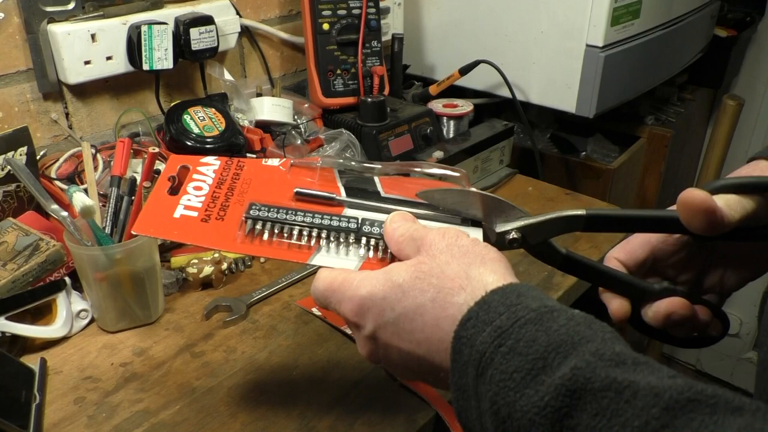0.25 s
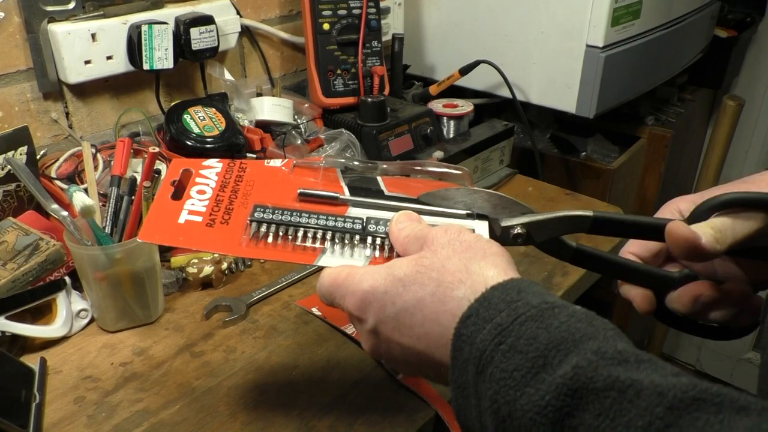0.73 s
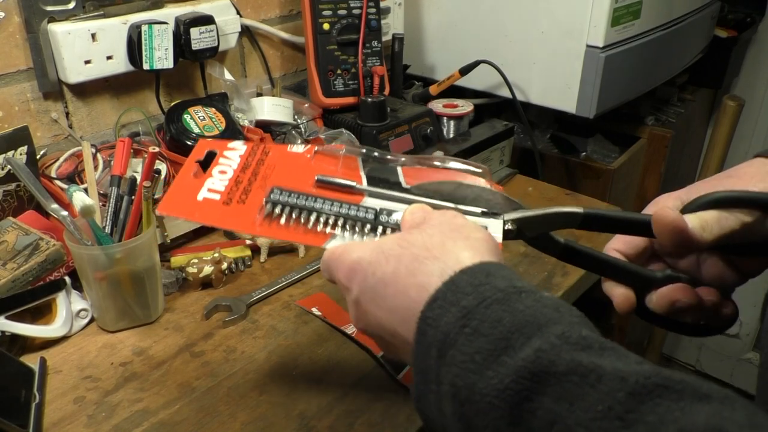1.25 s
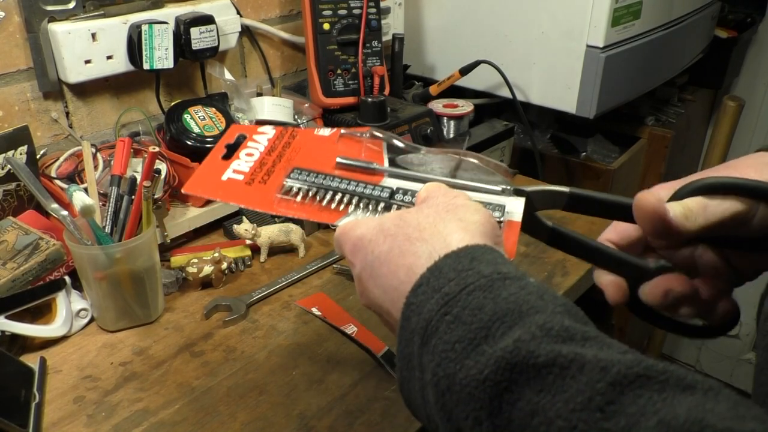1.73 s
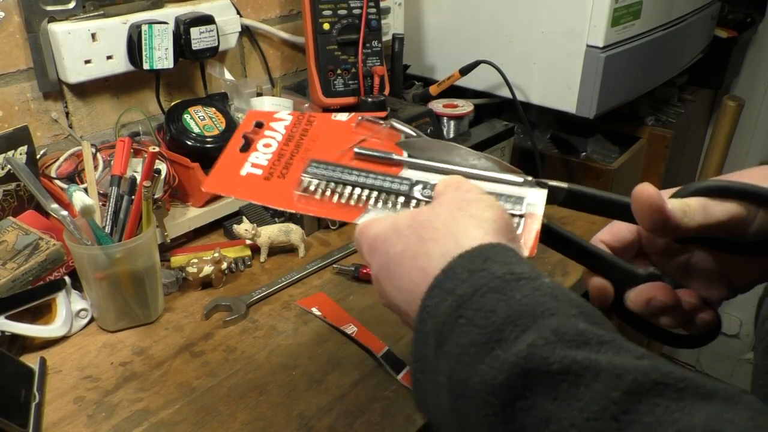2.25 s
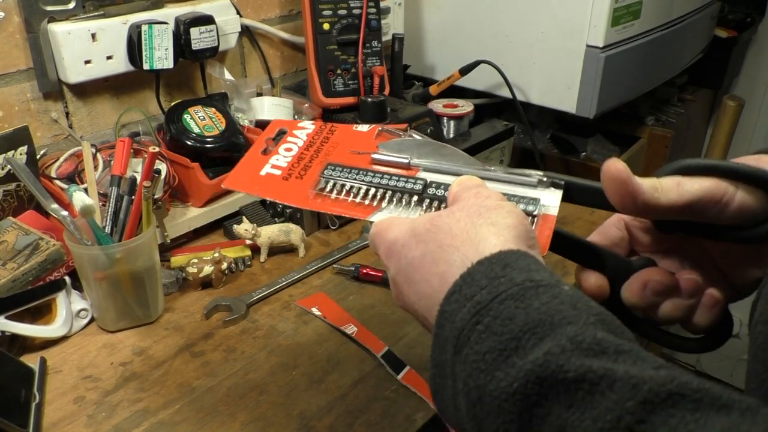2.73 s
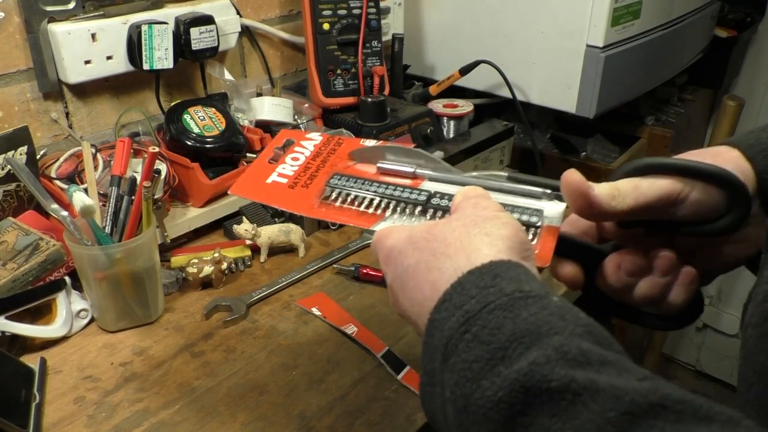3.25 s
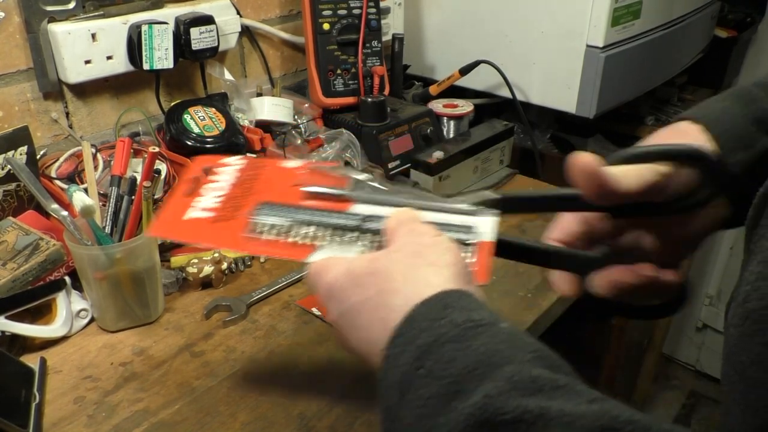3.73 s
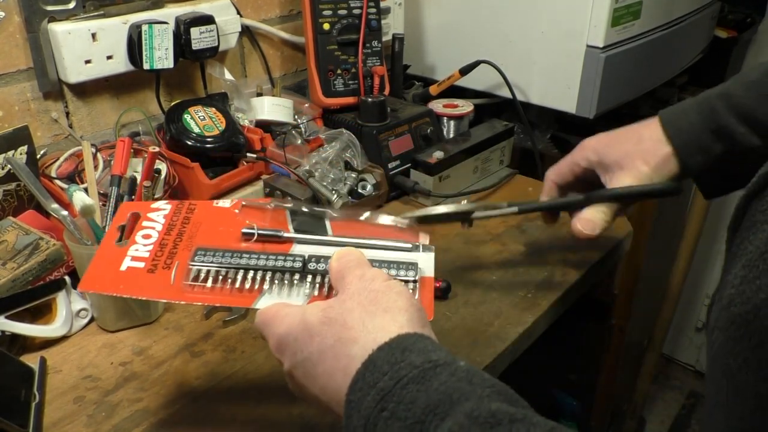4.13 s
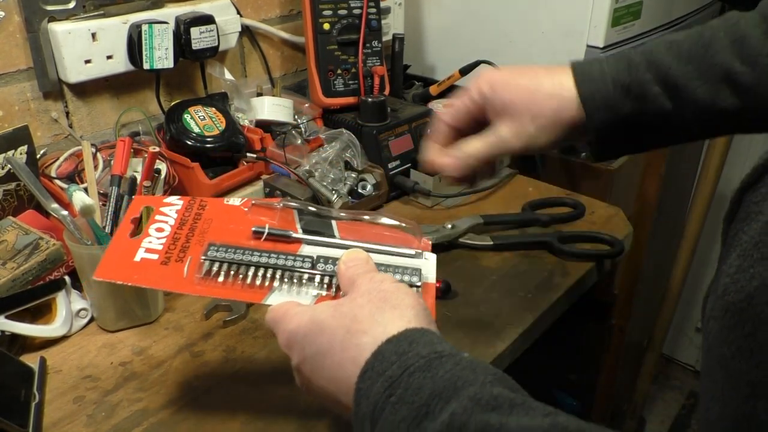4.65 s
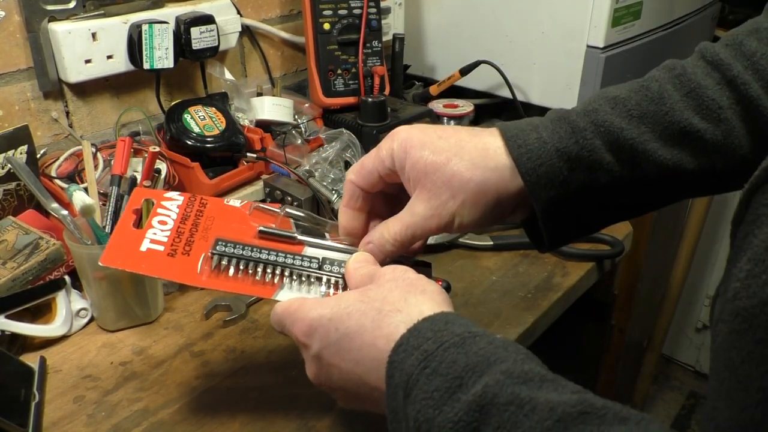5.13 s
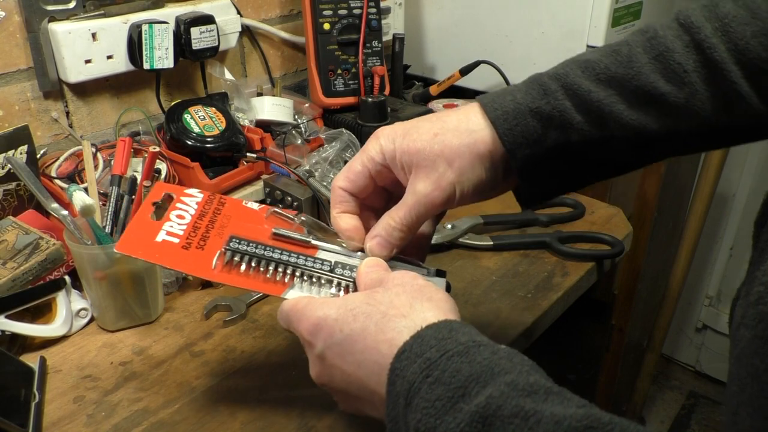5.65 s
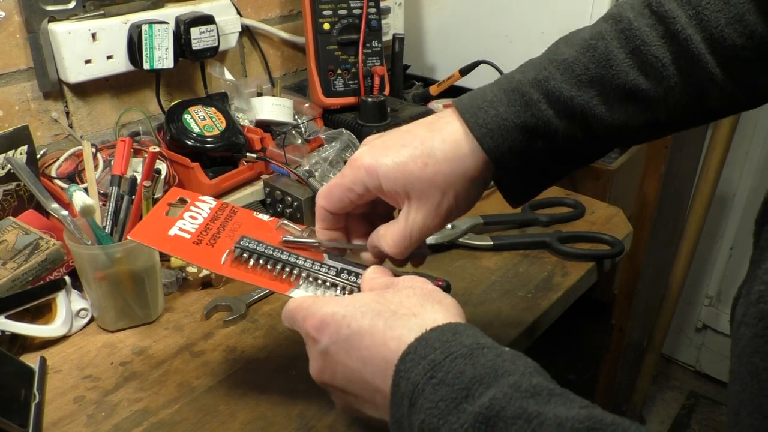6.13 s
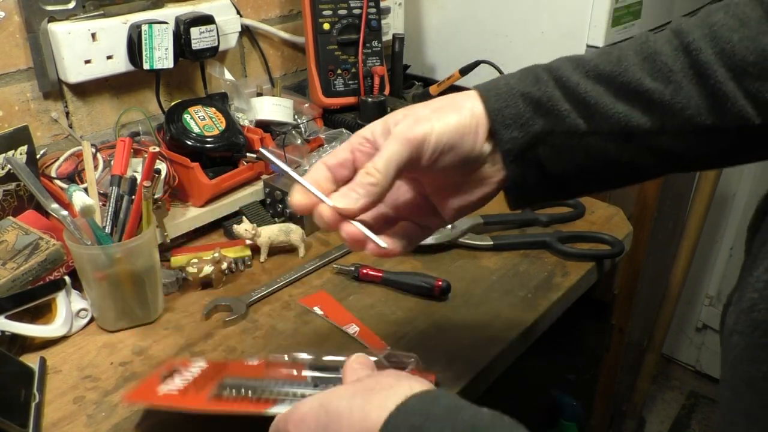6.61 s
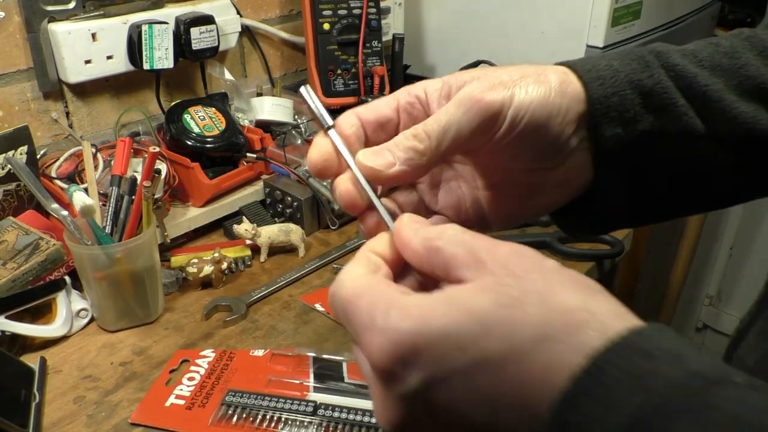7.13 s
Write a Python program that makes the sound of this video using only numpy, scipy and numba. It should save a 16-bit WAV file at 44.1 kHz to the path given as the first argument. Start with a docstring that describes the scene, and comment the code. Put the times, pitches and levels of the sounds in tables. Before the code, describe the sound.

Sharp irregular plastic cracks and short scrapes, a wood-and-steel clank, then crinkling, a brief creak and a light pack dropping onto a bench.

```python
"""Over faint room noise and rustling, a stiff plastic blister pack slaps softly against a hand.
Heavy tin snips then chew through it: sharp cracks are bursts of tiny random slips, scrapes a steadier stream.
The snips are laid down on a wooden bench, clanking, while decaying sine waves ring for wood and steel.
Fingers prise a part out of the crackling blister with a creak; last, the pack drops on the bench.
A small workshop's echo, made from fading noise, surrounds it all."""
import sys
import numpy as np
from scipy import signal
from scipy.fft import rfft, irfft
from scipy.io import wavfile
from numba import njit

SR = 44100
rng = np.random.default_rng(int(sys.argv[2]) if len(sys.argv) > 2 else 0)


def master_out(mix):
    """Clip the mix to full scale and print it as 16-bit PCM to the path in sys.argv[1]."""
    frames = np.transpose(np.atleast_2d(mix))
    ceiling = np.clip(frames, -1, 1)
    pcm = np.round(ceiling * 32767).astype(np.int16)
    wavfile.write(sys.argv[1], SR, pcm)


N = 325017  # length in samples

FLOOR_DB = -57.5  # level of the steady background
TOP_HZ = 16000  # highest frequency the recorder keeps
SHELL_DECAY_S = .0045  # time for the shell's ring to fall to about a third
LEAD_S = .02  # room for a sound to build up before its listed time

# Steady background noise. Each row: frequency in Hz, level in dB.
FLOOR_SPECTRUM = [(15, -58.5), (25, -8), (134, -6.5), (285, -10.5), (354, -13.5), (439, -13.5),
                  (591, -29.5), (714, -21.5), (818, -27.5), (1070, -22.5), (1330, -22), (1940, -28),
                  (5880, -48.5), (14800, -33.5), (16000, -50.5)]
# How much the background differs between left and right. Each row: frequency in Hz, level in dB.
FLOOR_WIDTH = [(40, -7.5), (150, -3.5), (400, -1.5), (1500, 2), (6000, -6.5), (12000, -3.5)]
# Sleeves and fingers shifting. Each row: time in seconds, level in dB.
RUSTLE_LEVEL = [(0, -55.5), (.42, -72), (.8, -63.5), (1.7, -61), (2.12, -62.5), (2.65, -50), (2.85, -61),
                (3.35, -62), (3.6, -43), (4.1, -48), (4.25, -67.5), (4.7, -62), (5.2, -52.5), (6.05, -57),
                (6.42, -67), (6.56, -54), (7, -55), (7.37, -70)]
# Basic tone of the plastic and card pack. Each row: frequency in Hz, level in dB.
PACK_SPECTRUM = [(40, -21.5), (150, -6.5), (250, -1), (330, 8.5), (450, 0.5), (650, -6), (850, -6.5),
                 (1100, -1), (1900, 1.5), (2800, -1.5), (4000, -1), (7000, -6), (12000, -6), (16000, -18.5)]
# The pack slapping the hand and the bench. Each row: time in seconds, level in dB, ring in Hz,
# card body in dB, decay in seconds.
SLAPS = [(0.2015, -39, 1290, 19, 0.014), (6.6209, -28, 1730, 29.5, 0.017), (6.648, -25, 1360, -10, .01),
         (6.74, -15, 1190, -6, 0.012), (6.7573, -13, 975, -4.5, 0.0084), (6.7724, -25.5, 1140, -1, 0.0068),
         (6.8619, -22, 1530, -0.5, 0.0065), (6.8787, -25.5, 1760, -3, 0.013),
         (6.9688, -36.5, 1630, 12, 0.011)]
# The sheet cracking under the blades. Each row: time in seconds, level in dB, ring of the free panel in Hz,
# card body in dB, treble in dB, decay in seconds, share of the single snap from 0 to 1.
CRACKS = [(0.6286, -25.5, 1930, 5.5, -3.5, 0.013, 0.02), (0.6525, -32.5, 990, 13, -6, 0.014, 0.65),
          (0.7188, -31, 2530, 2, -1, 0.0058, 0.02), (1.065, -23.5, 980, -11, -6, 0.0073, 0.03),
          (1.1051, -30, 2520, 1, 5, 0.0061, 0), (1.436, -31, 985, 0, -6, 0.017, 0.1),
          (1.4495, -26.5, 1020, 5, -13, 0.023, 0.35), (1.482, -33.5, 970, -6, -11, .008, 1),
          (1.4955, -18, 950, -5, -8, .011, 0.07), (1.6737, -17.5, 3640, -9.5, -7, 0.0041, 0.28),
          (1.806, -16.5, 1270, -5, -0.5, 0.017, 0.08), (1.8186, -26.5, 1380, 30, -4, 0.0043, 0.54),
          (1.9654, -22, 3900, -16, 14, 0.0084, 0.43), (2.231, -24.5, 6100, -7, -4, 0.0081, 0.5),
          (2.2357, -19.5, 1600, 13.5, 6.5, 0.012, 0.39), (2.2443, -19, 1410, 5, -5, .012, 0.04),
          (2.396, -22.5, 1140, 7, -15, 0.01, 0.09), (2.415, -21.5, 6700, -3, 0, 0.0082, 0.18),
          (2.451, -27, 3560, -7, 9.5, 0.011, 0.6), (2.5076, -30.5, 3500, -22.5, 6, 0.0092, 0.05),
          (2.7552, -29.5, 3300, -1, 12, 0.014, 0.6), (2.9206, -21, 6230, -7, 5, 0.009, 0.5),
          (2.9256, -28, 1410, 0, -6, 0.0055, 0.08), (2.946, -33, 2460, 9, 18, 0.01, 0.08),
          (3.0802, -29, 3540, -28, 6, 0.011, 0.15), (3.2419, -24.5, 2450, -3, 1.5, 0.016, 0.32),
          (3.252, -24.5, 2920, 14.5, 1, 0.0053, 0.04), (3.2605, -31, 1040, -3, -13, 0.011, 0.66),
          (3.5221, -19.5, 2530, 1.5, 0, 0.0032, 0.2), (3.532, -22, 1730, 2.5, -3, 0.01, 0),
          (3.754, -30, 6800, -1.5, -8, 0.0049, .02), (3.9459, -16, 1910, 1, -15, 0.0043, .45),
          (4.027, -21, 3380, 9.5, -8, 0.0064, 0.24), (4.0419, -19.5, 3680, 8, -0.5, 0.0038, 0.63)]
# Blades, fingers and bench dragging on the pack. Each row: start in seconds, end in seconds,
# level in dB before the common trim, ring in Hz, card body in dB, treble in dB.
SCRAPES = [(0.827, 0.967, -48, 3250, 5.5, 4), (1.011, 1.021, -45, 1170, 13, -4),
           (1.21, 1.262, -38, 1090, -7.5, 3.5), (1.513, 1.545, -30.5, 2240, 11, -13),
           (1.621, 1.679, -30.5, 3050, -4, 1.5), (1.764, 1.838, -34, 1370, 4, 1),
           (1.926, 1.952, -34.5, 3750, -3, 2), (2.375, 2.424, -27, 2880, 11.5, 6),
           (2.52, 2.58, -41.5, 1400, -7.5, -0.5), (2.953, 2.997, -38.5, 2280, 12.5, -6),
           (3.093, 3.141, -35, 2930, 5.5, 6.5), (3.421, 3.439, -29, 5600, -16, 2),
           (3.654, 3.694, -38.5, 5530, -3, -2), (3.714, 3.749, -34.5, 2940, 5.5, 0.5),
           (3.81, 3.879, -36, 2220, -19, -8), (3.958, 4.086, -33, 2180, 13, -1),
           (5.093, 5.117, -34, 6050, -19, 0), (5.42, 5.453, -33.5, 6900, -4, 2),
           (5.517, 5.61, -45, 3820, -17, 9.5), (5.939, 5.964, -36.5, 1170, -11, 1.5),
           (6.614, 6.721, -35, 1600, 12, -8.5), (6.77, 6.932, -39, 1790, 8, -13.5)]
# Lone ticks of the flexing pack. Each row: time in seconds, level in dB, ring in Hz.
TICKS = [(1.348, -54.5, 3430), (2.173, -46.5, 1480), (2.2869, -35, 1100), (2.6855, -40.5, 2730),
         (3.0511, -45, 5100), (3.3907, -38, 2770), (4.8452, -38, 2250), (4.8975, -40, 3360),
         (5.987, -36, 6300)]
# Two hard snaps, each with a low thump. Each row: time in seconds, level in dB, ring in Hz,
# thump in dB, thump rise time in seconds.
SNAPS = [(2.5793, -14.5, 4310, -14.5, 0.0003), (3.6836, -20, 5050, -20, 0.00036)]
# Dull bumps of the pack against hand, blades and bench. Each row: time in seconds, level in dB,
# pitch in Hz before a small random detune, time to fall by 60 dB in seconds.
BUMPS = [(3.458, -32.5, 435, 0.041), (3.588, -31, 355, 0.055), (3.6, -25, 326, 0.04),
         (3.625, -33, 342, 0.038), (6.628, -39, 162.8, 0.58), (6.741, -42, 129.5, 0.3),
         (6.859, -46.5, 154, 0.5)]
# Steel striking steel as the snips land. Each row: time in seconds, level in dB before the steel trim.
CLASHES = [(4.339, -49.5), (4.5245, -51.5)]
# The snips meeting the bench. Each row: time in seconds, level in dB, contact brightness in Hz, decay in seconds.
KNOCKS = [(4.3394, -26.5, 5460, 0.0054), (4.3421, -17, 1200, 0.0063), (4.3938, -22.5, 586, 0.013),
          (4.4175, -31, 397, 0.053), (4.5226, -16.5, 1370, 0.004), (4.5257, -19, 9900, 0.01),
          (4.576, -27, 640, 0.013), (4.5949, -24, 774, 0.025), (4.618, -34.5, 1470, 0.019)]
# Tone of the snips' contact with the bench. Each row: frequency in Hz, level in dB.
CLANK_SPECTRUM = [(40, -61), (70, -41.5), (125, -2), (280, 2.5), (520, 0), (750, -4), (1050, 3.5),
                  (1450, 3.5), (2100, 4.5), (3200, 2.5), (6500, 1), (10500, 7), (16000, 3)]
# Ringing of the bench top. Each row: pitch in Hz before detune, relative level in dB,
# time to fall by 60 dB in seconds.
BENCH_MODES = [(102, -22, 0.26), (132.6, 6, 0.32), (158, -5.5, 0.66), (264, -15, .2), (316, 6.5, 0.11),
               (420, -3, 0.21), (527, 10, 0.081), (584, -25, 0.091), (630, 1, .15)]
# Ringing of the steel blades and handles. Each row: pitch in Hz before detune, relative level in dB,
# time to fall by 60 dB in seconds.
STEEL_MODES = [(2490, 3, .25), (4748, -4, .55), (5448, -2, .33), (6130, -8, .25), (7251, -6, .4),
               (7730, -5, .27), (9895, -1, .36), (10780, -4, .25), (11095, -3, .9), (11850, -4, .15),
               (13100, -14, .35)]
# The blister buckling under the fingers. Each row: time in seconds, level in dB, ring in Hz, card body in dB,
# treble in dB, decay in seconds, share of the single snap from 0 to 1.
CRINKLES = [(4.7756, -35, 2820, 9.5, -8.5, 0.0086, 0.65), (5.1128, -31, 6050, -3, 9, 0.0071, 0.5),
            (5.2558, -37, 7300, 8, 2, 0.021, 0.1), (5.361, -32.5, 4730, -55, 4, 0.012, 0.7),
            (5.4022, -30.5, 930, 6.5, 4.5, 0.0058, 0.55), (5.423, -27, 6500, -5.5, -10, 0.0035, 0.3),
            (5.7348, -40.5, 1760, 4, -5, 0.0081, 0.5), (5.7717, -30.5, 1010, -16, -6.5, .006, 0.07),
            (6.1187, -20.5, 3360, 20, 10.5, 0.0059, 0), (6.2228, -30.5, 3860, -12, 5, 0.0044, 0.2),
            (6.285, -16.5, 4750, 2, -18, 0.0079, 0.16)]
# The part rubbing its way out of the blister. Each row: time in seconds, level in dB before the trim, ring in Hz.
CREAK = [(6.03, -54.5, 3500), (6.105, -33, 3280), (6.136, -46, 3470), (6.164, -25, 3850),
         (6.196, -50, 3750), (6.24, -41.5, 3580), (6.28, -29, 3020), (6.295, -39.5, 2970)]
# Tone of the workshop's echo. Each row: frequency in Hz, level in dB.
ROOM_COLOUR = [(60, -38.5), (300, -8), (650, 0.5), (1500, 2), (3500, -3.5), (7000, -3), (16000, -19.5)]
# How fast the echo fades. Each row: frequency in Hz, time to fall by 60 dB in seconds.
ROOM_DECAY = [(150, 1), (500, 0.24), (1500, 0.25), (4000, 0.25), (12000, 0.31)]
# How much the echo differs between left and right. Each row: frequency in Hz, level in dB.
ECHO_WIDTH = [(60, -3.5), (150, -3.5), (300, -10), (600, -2), (1300, -3), (4000, -2.5), (8000, -13.5),
              (13000, 1)]


def undb(db):
    """Turn decibels into a gain."""
    return 10 ** (np.asarray(db) / 20)


def unit(x):
    """Scale to unit energy."""
    return x / np.sqrt(np.sum(x ** 2) + 1e-18)


def add(track, s, sound):
    """Mix a sound into a track at time s, in seconds."""
    i = max(int(s * SR), 0)
    track[i:i + len(sound)] += sound[:max(len(track) - i, 0)]


def along(points, hz):
    """Read (Hz, value) points on a log-frequency axis."""
    f, value = np.transpose(points)
    return np.interp(np.log(hz + 1), np.log(f), value)


def bins(size):
    """Frequencies of a real Fourier transform."""
    return np.arange(size // 2 + 1) * SR / size


def response(db):
    """Make a filter with the given gain curve that never sounds before its input."""
    cepstrum = irfft(np.log(undb(db)))
    half = len(cepstrum) // 2
    # folding the cepstrum forward gives the minimum-phase filter
    cepstrum[1:half] *= 2
    cepstrum[half + 1:] = 0
    return irfft(np.exp(rfft(cepstrum)))[:half]


def colour(x, points):
    """Filter by a (Hz, dB) spectrum."""
    gain = undb(along(points, bins(len(x))))
    return irfft(rfft(x) * gain, len(x))


def wander(rate):
    """Random values joined by straight lines, rate of them a second."""
    steps = np.arange(N) * rate / SR
    return np.interp(steps, np.arange(N // 50), rng.standard_normal(N // 50))


def crackle(size, per_s, spread_db):
    """Tiny slips at random moments, with strengths spread at random."""
    chance, side, draw = rng.random((size, 3)).T
    strength = -np.log(1 - .995 * draw)
    happens = chance < per_s / SR
    return happens * np.sign(side - .5) * undb(spread_db * strength)


def panel(ring_hz, ring_db, card_db, treble_db, ring_width=0.23, card_hz=700, treble_hz=5500, sheet_hz=130):
    """Response of the pack as it is held: one broad panel resonance, the card below, the cut edge above."""
    f = bins(size=2048) + 1
    ring = ring_db / (1 + (np.log(f / ring_hz) / ring_width) ** 2)
    # a small card radiates little bass, however hard it is flexed
    card = card_db / (1 + (f / card_hz) ** 3) / (1 + (sheet_hz / f) ** 3)
    edge = treble_db / (1 + (treble_hz / f) ** 3)
    return response(along(PACK_SPECTRUM, f) + ring + card + edge)


def blister(drive, low_hz=1000, high_hz=5000, ring_db=-6):
    """Narrow shell modes ring on after each slip; each call picks new pitches for the bent blister."""
    t = np.arange(SR // 20) / SR
    hz = low_hz * (high_hz / low_hz) ** rng.random(size=12)
    modes = np.cos(2 * np.pi * hz[:, None] * t).sum(0)
    shell = undb(ring_db) * unit(modes * np.exp(-t / SHELL_DECAY_S)) / 2
    shell[0] += 1  # the slip itself
    return signal.fftconvolve(drive, shell)


def fracture(db, response_of_pack, decay, share, rise_s=0.0013, rise_share=.22, tear_per_s=9000,
             spread_db=2.0, jerk_db=3.0, jerk_per_s=450, snap_s=0.00047, run_share=0.53):
    """A tear gathers speed in jerks, the sheet snaps, and smaller fractures die away behind it."""
    t = np.arange(SR // 10) / SR - LEAD_S
    share, decay = np.clip(share, 0, 1), max(decay, 1e-3)
    rise = (rise_s + rise_share * decay) * (1 - share) + 1e-4
    swell = np.exp(-np.abs(t) / np.where(t < 0, rise, decay))
    jerks = np.interp((t + LEAD_S) * jerk_per_s, np.arange(SR // 100), rng.standard_normal(SR // 100))
    tearing = unit(crackle(len(t), tear_per_s, spread_db) * swell * undb(jerk_db * jerks))
    # the main fracture takes a fraction of a millisecond to run through the sheet
    running = unit(rng.standard_normal(len(t)) * np.exp(-np.abs(t) / snap_s))
    instant = np.abs(t) < .5 / SR
    snap = unit(run_share * running + (1 - run_share) * instant)
    drive = np.sqrt(1 - share) * tearing + np.sqrt(share) * snap
    sound = signal.fftconvolve(blister(drive), response_of_pack)
    return unit(sound) * undb(db) * np.sqrt(SR / 100)  # level as if spread over 10 ms


def shudder(db, decay_s=0.019, slips_per_s=2500, spread_db=3, after_db=-13):
    """After a crack the freed edges chafe each other and the card settles."""
    t = np.arange(SR // 6) / SR
    swell = np.exp(-t / decay_s) * (1 - np.exp(-2 * t / decay_s))
    slips = crackle(len(t), slips_per_s, spread_db) * swell
    sound = signal.fftconvolve(blister(slips), panel(ring_hz=1590, ring_db=0.5, card_db=1, treble_db=-9))
    return unit(sound) * undb(db + after_db) * np.sqrt(SR / 100)  # level as if spread over 10 ms


def ringing(modes, detune=.004):
    """Damped modes, each randomly detuned a little at every strike."""
    t = np.arange(SR) / SR
    total = 0
    for hz, db, t60 in modes:
        struck_hz = hz * (1 + detune * rng.standard_normal())
        total = total + undb(db) * np.sin(2 * np.pi * struck_hz * t) * undb(-60 * t / t60)
    return total


def room_tone():
    """Steady low rumble and hiss: filtered noise, with one part shared and one opposed left and right."""
    mid, side = (unit(colour(rng.standard_normal(N), FLOOR_SPECTRUM)) * np.sqrt(N) for _ in range(2))
    side = colour(side, FLOOR_WIDTH)
    return undb(FLOOR_DB) * (mid + np.array([side, -side]))


def rustle(grains_per_s=4000, spread_db=3, ring_hz=2200, ring_db=4, card_db=-2, treble_db=-6,
           shift_db=5.5, ticks_per_s=30, tick_db=-9):
    """Faint friction of cloth and skin, with stray ticks as the held pack flexes."""
    friction = crackle(N, grains_per_s, spread_db) * undb(shift_db * wander(rate=30))
    friction = signal.fftconvolve(friction, panel(ring_hz, ring_db, card_db, treble_db))[:N]
    flexing = crackle(N, ticks_per_s, spread_db=1.5)
    pack = panel(ring_hz=3780, ring_db=9.5, card_db=7.5, treble_db=-19)
    stray = signal.fftconvolve(blister(flexing), pack)[:N]
    level = undb(np.interp(np.arange(N) / SR, *np.transpose(RUSTLE_LEVEL)))
    return (unit(friction) + undb(tick_db) * unit(stray)) * np.sqrt(N) * level


def slaps(ring_db=8, treble_db=-14):
    """The card lands flat: a dull burst with little snap, then a fainter rattle of small slips."""
    out = np.zeros(N)
    for s, db, ring_hz, card_db, decay in SLAPS:
        pack = panel(ring_hz, ring_db, card_db, treble_db)
        add(out, s - LEAD_S, fracture(db, pack, decay, share=0.12, rise_s=0.0024, rise_share=0))
        add(out, s, shudder(db, decay_s=0.033, after_db=-16))
    return out


def cracks(ring_db=9):
    """The blades break through, and the sheet shudders after each break."""
    out = np.zeros(N)
    for s, db, ring_hz, card_db, treble_db, decay, share in CRACKS:
        pack = panel(ring_hz, ring_db, card_db, treble_db)
        add(out, s - LEAD_S, fracture(db, pack, decay, share))
        add(out, s, shudder(db))
    return out


def scrapes(slips_per_s=6500, spread_db=3.0, catch_db=2.0, catch_per_s=150, attack_s=.005,
            release_s=.012, ring_db=8, trim_db=-1):
    """Stick-slip of an edge along the plastic: it bites, slips unevenly, and lets go."""
    out = np.zeros(N)
    grains = crackle(N, slips_per_s, spread_db) * undb(catch_db * wander(catch_per_s))
    for start, end, db, ring_hz, card_db, treble_db in SCRAPES:
        i = np.arange(int((start - LEAD_S) * SR), int(end * SR) + SR // 15)
        t = i / SR
        before, after = np.maximum(start - t, 0), np.maximum(t - end, 0)
        pressure = undb(db + trim_db) * np.exp(-before / attack_s - after / release_s)
        pack = panel(ring_hz, ring_db, card_db, treble_db)
        sound = signal.fftconvolve(blister(grains[i] * pressure), pack)
        add(out, t[0], unit(sound) * np.sqrt(np.sum(pressure ** 2)))
    return out


def ticks(ring_db=7, card_db=-6, treble_db=-8):
    """A crease flips over: small and sudden, with much the same shape each time."""
    out = np.zeros(N)
    for s, db, ring_hz in TICKS:
        pack = panel(ring_hz, ring_db, card_db, treble_db)
        add(out, s - LEAD_S, fracture(db, pack, decay=0.025, share=.6, rise_share=0))
    return out


def snaps(ring_db=6, card_db=1, treble_db=5.0):
    """Each hard, bright snap comes with a low thump: a quick pulse, then a slower opposite swing."""
    out, t = np.zeros(N), np.arange(SR // 20) / SR
    for s, db, ring_hz, thump_db, rise_s in SNAPS:
        pack = panel(ring_hz, ring_db, card_db, treble_db)
        add(out, s - LEAD_S, fracture(db, pack, decay=.005, share=0.7, rise_share=.1))
        u = t / rise_s
        pulse = u * np.exp(1 - u)
        swing = u / 100 * np.exp(1 - u / 10)
        add(out, s - rise_s, -undb(thump_db) * (pulse - swing))
    return out


def bumps():
    """Soft contacts stir only one low, damped mode."""
    out = np.zeros(N)
    for s, db, hz, t60 in BUMPS:
        add(out, s, ringing([(hz, db, t60)]))
    return out


def snips_laid_down(chatter_per_s=8000, blow_share=0.34, bench_db=-29.5, buzz_db=-47, buzz_s=0.051,
                    steel_db=1.0, lowest_hz=75):
    """Blades, then handles, chatter on the wood and rock to rest; bench and steel ring on."""
    out, t, f = np.zeros(N), np.arange(SR // 4) / SR, bins(size=2048)
    for s, db, bright_hz, decay in KNOCKS:
        drive = unit(crackle(len(t), chatter_per_s, 4.1) * np.exp(-t / decay))
        drive[0] += blow_share
        # a duller contact loses its treble above bright_hz
        contact = response(along(CLANK_SPECTRUM, f) - 10 * np.log10(1 + (f / bright_hz) ** 4))
        knock = unit(signal.fftconvolve(drive, contact))
        add(out, s, undb(db) * knock * np.sqrt(SR / 100))  # level as if spread over 10 ms
        # halving the dB: the bench's ring varies less from knock to knock than the contact does
        add(out, s, undb(db / 2 + bench_db) * ringing(BENCH_MODES, detune=0.0045))
    for s, db in CLASHES:
        add(out, s, undb(db + steel_db) * ringing(STEEL_MODES, detune=.0003))
        # the loose pivot buzzes briefly
        buzz = unit(colour(crackle(len(t), chatter_per_s, 2.3), CLANK_SPECTRUM)) * np.sqrt(len(t))
        add(out, s, undb(buzz_db) * buzz * np.exp(-t / buzz_s))
    # little of the snips and bench sounds below lowest_hz
    return signal.sosfilt(signal.butter(2, lowest_hz, "high", fs=SR, output="sos"), out)


def crinkles(ring_db=10):
    """The thin shell buckles between the fingers, and a faint shudder follows."""
    out = np.zeros(N)
    for s, db, ring_hz, card_db, treble_db, decay, share in CRINKLES:
        pack = panel(ring_hz, ring_db, card_db, treble_db, ring_width=0.21, card_hz=870)
        add(out, s - LEAD_S, fracture(db, pack, decay, share, rise_s=0.0009, rise_share=0.21))
        add(out, s, shudder(db, decay_s=0.03, after_db=-18))
    return out


@njit
def resonate(x, hz, width):
    """Band-pass filter with a moving centre; width is in Hz."""
    y, band, low = np.empty(len(x)), 0., 0.
    for i in range(len(x)):
        g, damping = np.tan(np.pi * hz[i] / SR), width / hz[i]
        v = (band + g * (x[i] - low)) / (1 + g * (g + damping))
        # the two stored states step forward, and the damped band is heard
        band, low, y[i] = 2 * v - band, low + 2 * g * v, damping * v
    return y


def creak(slips_per_s=3000, spread_db=-1.0, width_hz=700, ring_db=16, trim_db=-1):
    """The part drags against the shell, whose ring slides as it bends."""
    s, db, hz = np.transpose(CREAK)
    out, t = np.zeros(N), np.arange(int(s[0] * SR), int(s[-1] * SR)) / SR
    pressure = undb(np.interp(t, s, db) + trim_db)
    slips = crackle(len(t), slips_per_s, spread_db) * pressure
    slips = slips + undb(ring_db) * resonate(slips, np.interp(t, s, hz), float(width_hz))
    sound = signal.fftconvolve(slips, panel(ring_hz=4400, ring_db=2.5, card_db=2.5, treble_db=7))
    add(out, t[0], unit(sound) * np.sqrt(np.sum(pressure ** 2)))
    return out


def workshop(x, room_db, near_db, near_s=0.0011, build_s=0.0026):
    """One layer of echo: quick scatter from the cluttered bench, then a short room tail."""
    t = np.arange(SR // 2) / SR
    noise, tail = rfft(rng.standard_normal(len(t))), 0
    # split the noise into overlapping bands, each fading at its own speed
    band_hz = [hz for hz, _ in ROOM_DECAY]
    place = np.interp(np.log(bins(len(t)) + 1), np.log(band_hz), np.arange(len(ROOM_DECAY)))
    for k, (_, t60) in enumerate(ROOM_DECAY):
        band = irfft(noise * np.maximum(1 - np.abs(place - k), 0), len(t))
        tail = tail + band * undb(-60 * t / t60)
    tail = colour(unit(tail * (1 - np.exp(-t / build_s)) ** 2), ROOM_COLOUR)
    near = unit(rng.standard_normal(len(t)) * t * np.exp(-2 * t / near_s))
    return signal.fftconvolve(x, undb(room_db) * tail + undb(near_db) * near)[:N]


def scene():
    """All the handling happens straight ahead; the echoes and background give it width."""
    pack = slaps() + cracks() + scrapes() + ticks() + snaps() + bumps() + crinkles() + creak()
    direct = rustle() + pack + snips_laid_down()
    shared = workshop(direct, room_db=-15.0, near_db=-18)
    side = colour(workshop(direct, room_db=-16, near_db=-7.5), ECHO_WIDTH)
    return direct + shared + np.array([side, -side]) + room_tone()


def record(dry):
    """The recorder clips at full scale and cuts the top."""
    low_pass = signal.ellip(8, .2, 70, TOP_HZ, fs=SR, output="sos")
    return signal.sosfilt(low_pass, np.clip(dry, -1, 1))


dry = scene()
out = record(dry)
master_out(out)
```